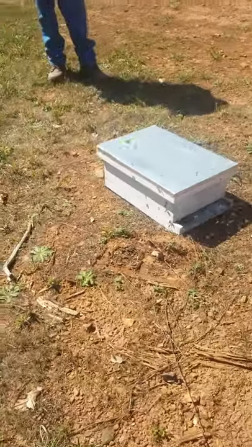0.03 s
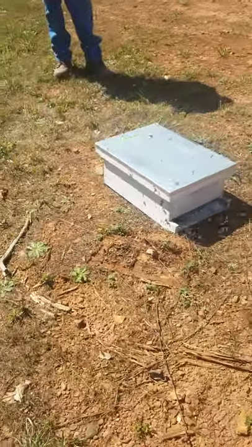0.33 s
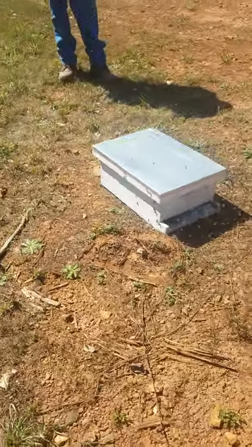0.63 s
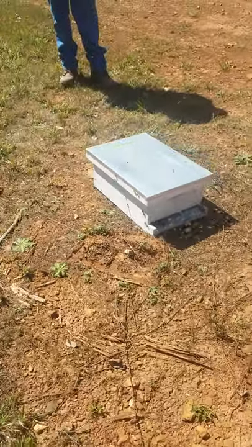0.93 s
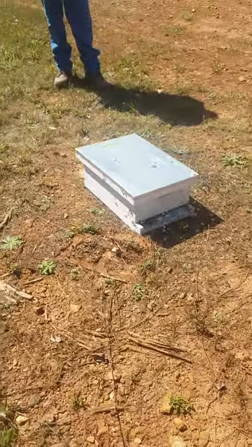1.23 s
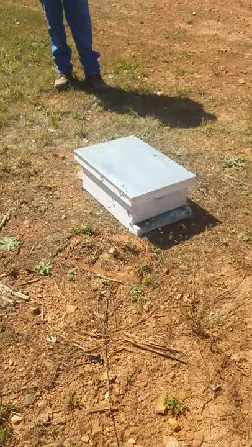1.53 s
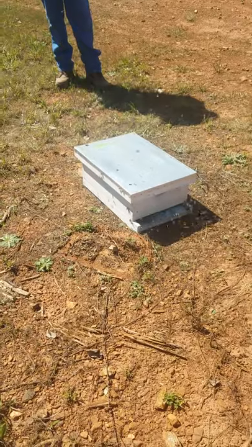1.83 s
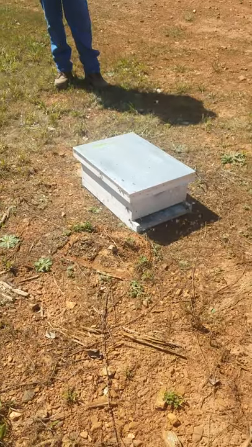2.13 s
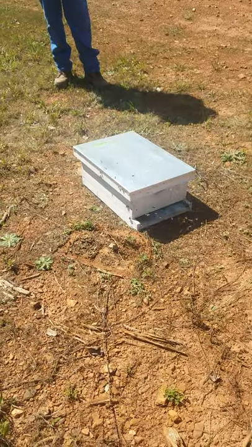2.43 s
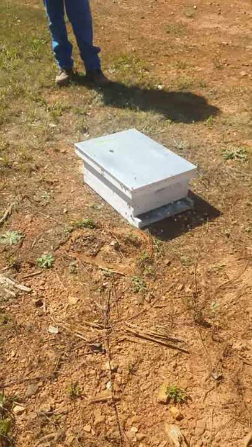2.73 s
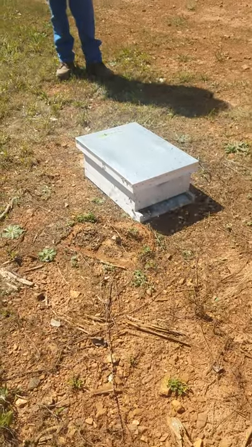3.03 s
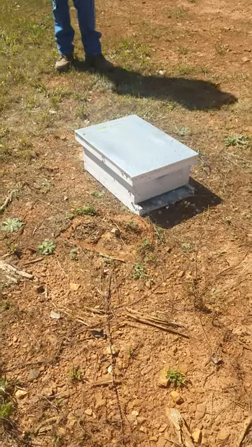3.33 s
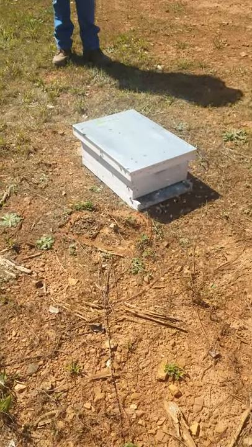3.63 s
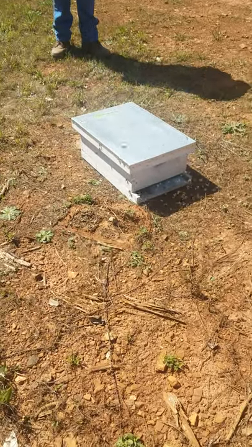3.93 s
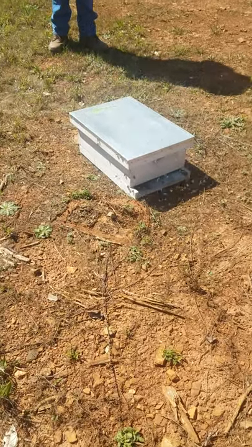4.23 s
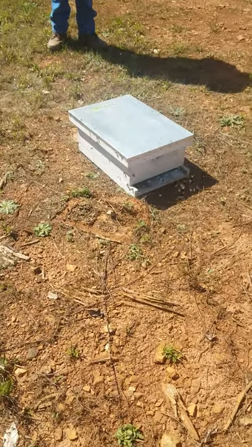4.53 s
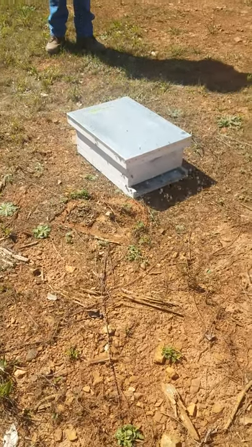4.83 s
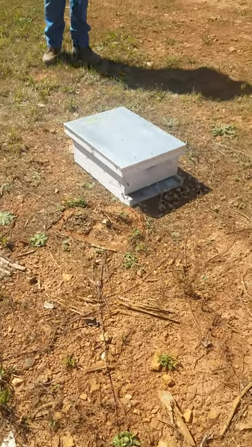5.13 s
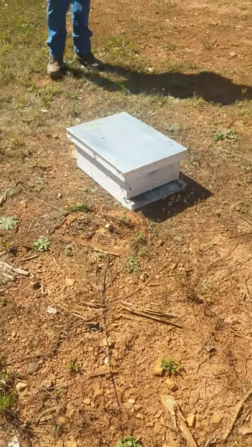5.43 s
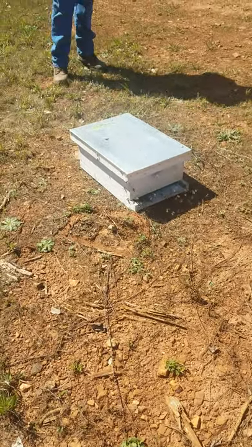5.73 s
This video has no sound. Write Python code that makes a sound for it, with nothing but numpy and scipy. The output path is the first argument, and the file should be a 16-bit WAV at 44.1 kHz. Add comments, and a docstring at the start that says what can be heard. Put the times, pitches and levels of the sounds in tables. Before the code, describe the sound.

Gusty wind rumbles and thumps on the microphone outdoors, over faint bee humming, boot scuffs in dry grass and distant birds.

```python
"""Wind on a microphone beside a beehive.

Gusts buffet the two ports of a hand-held microphone with rumble and eddies. Beneath them, in a dry
field, bees' wingbeats hum, boots scuff grass and soil, twigs tick, small birds call far off and a
hand rubs the case. The left port is open; the sheltered right one hears the field weaker and duller."""
import sys
import numpy as np
from scipy import signal
from scipy.fft import rfft, irfft, next_fast_len
from scipy.io import wavfile
from scipy.ndimage import uniform_filter1d, minimum_filter1d, map_coordinates

SR = 44100
rng = np.random.default_rng(int(sys.argv[2]) if len(sys.argv) > 2 else 0)


def master_out(mix):
    """Clip the mix to full scale and print it as 16-bit PCM to the path in sys.argv[1]."""
    frames = np.transpose(np.atleast_2d(mix))
    ceiling = np.clip(frames, -1, 1)
    pcm = np.round(ceiling * 32767).astype(np.int16)
    wavfile.write(sys.argv[1], SR, pcm)


N = 254898


def amp(db):
    """Decibels to gain."""
    return 10 ** (np.asarray(db) / 20)


def unit(x):
    """Scale to rms 1."""
    return x / np.sqrt(np.mean(x ** 2) + 1e-20)


def even(x, window_samples=1800):
    """Hold the short-term rms near 1."""
    power = uniform_filter1d(uniform_filter1d(x ** 2, window_samples), window_samples // 2)
    return x / np.sqrt(np.abs(power) + .062 * np.mean(x ** 2))


def along(points, hz):
    """Interpolate (freq_hz, value) points on a log axis."""
    freq_hz, values = np.transpose(points)
    return np.interp(np.log(hz + 1), np.log(freq_hz + 1), values)


def wobble(rate_hz):
    """Smooth random curve through rate_hz knots a second."""
    return map_coordinates(rng.standard_normal(4096), [np.arange(N) * rate_hz / SR], mode="mirror")


def coloured(x, gain):
    """Filter by the function gain(hz)."""
    size = next_fast_len(N + 8192)
    return irfft(rfft(x, size) * gain(np.fft.rfftfreq(size, 1 / SR)), size)[..., :N]


def shaped(x, curve):
    """Filter by (freq_hz, gain_db) points."""
    return coloured(x, lambda hz: amp(along(curve, hz)))


def noise(spectrum):
    """Noise of the given spectrum, rms 1."""
    return unit(shaped(rng.standard_normal(N), spectrum))


def crackle(spectrum, rate_hz, grain_share):
    """Tiny fractures on a bed of friction noise, rms 1."""
    grains = unit((rng.random(N) < rate_hz / SR) * rng.standard_normal(N))
    friction = rng.standard_normal(N)
    return unit(shaped(np.sqrt(grain_share) * grains + np.sqrt(1 - grain_share) * friction, spectrum))


def add(track, start_s, sound):
    """Mix a short sound into the track."""
    part = track[max(round(start_s * SR), 0):][:len(sound)]
    part += sound[:len(part)]


def swell(start_s, length_s, attack_s, release_s, sag_db_per_s):
    """Gain that rises, holds and dies; attack and release per 20 dB, negative sag grows."""
    t = np.arange(N) / SR - start_s
    outside = np.maximum(-t, 0) / attack_s + np.maximum(t - length_s, 0) / release_s
    return amp(-20 * outside - sag_db_per_s * (np.clip(t, 0, length_s) - length_s / 2))


def overlap(rows, **shape):
    """Power sum of swells, one gain curve per level column."""
    return np.sqrt(sum(np.outer(amp(levels_db), swell(start_s, length_s, **shape)) ** 2
                       for start_s, length_s, *levels_db in rows))


def ports(left, right):
    """Stereo pair: shelter weakens and dulls the right port."""
    # shelter transmission: freq_hz, gain_db
    shelter = [(100, -3.5), (700, -9.5), (2400, -7.5), (4200, -8), (5500, -15), (9000, -40), (15000, -22)]
    return np.array([left, shaped(right, shelter)])


def diffuse(a, b):
    """Two unrelated sounds as one diffuse field, most alike in the bass."""
    # likeness at the two ports: freq_hz, coherence
    coherence = [(60, 0.44), (240, 0.82), (480, 0.69), (950, 0.35), (2000, 0.02), (6000, 0)]
    angle = lambda hz: np.arccos(np.clip(along(coherence, hz), 0, 1)) / 2
    mid = coloured(a, lambda hz: np.cos(angle(hz)))
    side = coloured(b, lambda hz: np.sin(angle(hz)))
    return ports(mid + side, mid - side)


def air():
    """Soft, slowly swaying open air over steady microphone hiss."""
    # open-air spectrum: freq_hz, density_db
    air_spectrum = [(20, 5), (70, 7.5), (150, 1), (210, 4), (320, 0.5), (450, 8.5), (650, -2), (1300, -2),
                    (2000, -7.5), (3300, -12), (5000, -20), (8000, -31), (16000, -45)]
    # channel hiss spectrum: freq_hz, density_db
    hiss_spectrum = [(1000, -20), (4000, -11), (6500, -6), (10000, -5), (12500, 2.5), (16000, -0.5)]
    field = diffuse(noise(air_spectrum), noise(air_spectrum)) * amp(-49.5 + .38 * wobble(2.46))
    return field + np.array([amp(db) * noise(hiss_spectrum) for db in (-59.5, -72.5)])


def note(length_s, start_hz, end_hz):
    """Bird note: a straight glide that swells and fades."""
    progress = np.linspace(0, 1, round(length_s * SR))
    pitch_hz = start_hz + (end_hz - start_hz) * progress
    return np.sin(np.pi * progress) * np.sin(2 * np.pi * np.cumsum(pitch_hz) / SR)


def chirps(start_s=1.418, every_s=.143, top_hz=5200, step_hz=270, level_db=-63):
    """Four falling chirps, each starting lower."""
    out = np.zeros(N)
    for k in range(4):
        chirp = note(length_s=.065, start_hz=top_hz - k * step_hz, end_hz=3130)
        add(out, start_s + k * every_s, amp(level_db) * chirp)
    return out


def seesaw(start_s=2.294, every_s=.2405, high_hz=3420, low_hz=2080, level_db=-58.5):
    """Evenly spaced, slightly falling pips, high and low in turn."""
    out = np.zeros(N)
    for k in range(7):
        for beat, hz in [(k, high_hz), (k + .5, low_hz)]:
            pip = note(length_s=.026, start_hz=hz * 1.0125, end_hz=hz * .9875)
            add(out, start_s + beat * every_s, amp(level_db) * pip)
    return out


def whistle(start_s=5.085, length_s=.32, start_hz=5700, end_hz=5210, settle_s=.08):
    """Thin whistle: an accented downslide, then a wavering note that grows."""
    t = np.maximum(np.arange(N) / SR - start_s, 0)
    pitch_hz = end_hz + (start_hz - end_hz) * np.exp(-t / settle_s)
    phase = 2 * np.pi * np.cumsum(pitch_hz * (1 + .006 * wobble(130))) / SR
    slide = amp(-67) * swell(start_s, settle_s / 2, attack_s=.025, release_s=.06, sag_db_per_s=10)
    hold = amp(-70) * swell(start_s, length_s, attack_s=.025, release_s=.04, sag_db_per_s=-50)
    return (slide + hold) * amp(3 * wobble(45)) * np.sin(phase)


def scattered(x, t60_s, wet_db):
    """Ground and trees add a short diffuse tail."""
    t = np.arange(SR // 3) / SR
    tail = rng.standard_normal(len(t)) * amp(-60 * t / t60_s)
    return x + amp(wet_db) * signal.fftconvolve(x, tail / np.linalg.norm(tail))[:N]


def birds():
    """Three far birds across the field."""
    calls = chirps() + seesaw() + whistle()
    left = scattered(calls, t60_s=.31, wet_db=-5.5)
    right = amp(-11) * scattered(calls, t60_s=.2, wet_db=1)
    return ports(left, right)


def bees(count=8):
    """Wingbeats of count bees per kind, each drifting in pitch and distance."""
    # wingbeat of each kind: pitch_hz, drift_ratio, level_db
    wingbeats = [(257, .03, -51.5), (203, .03, -58)]
    # wingbeat harmonics: multiple, level_db
    harmonics = [(1, -2.5), (2, -.7), (3, -12), (4, -9.5), (5, -12.5), (6, -26)]
    out = np.zeros(N)
    for pitch_hz, drift_ratio, level_db in wingbeats:
        for _ in range(count):
            phase = 2 * np.pi * np.cumsum(pitch_hz * (1 + drift_ratio * wobble(12))) / SR
            buzz = sum(amp(db) * np.sin(multiple * phase) for multiple, db in harmonics)
            nearness = amp(1.9 * wobble(3.95))
            out += amp(level_db) * unit(buzz * nearness) / np.sqrt(count)
    return out


def footsteps():
    """Boots brush dry blades and crunch soil in uneven clumps."""
    # boot scuffs: start_s, length_s, swish_db, crunch_db
    scuffs = [(.585, .08, -54.5, -55), (.69, .29, -72, -58), (1.87, .14, -65, -64), (2.62, .37, -63.5, -64),
              (3.59, .035, -56.5, -47.5), (3.98, .11, -56.5, -53.5), (4.175, .045, -43, -45),
              (4.235, .11, -54, -57), (4.88, .05, -62, -53), (5.47, .3, -52.5, -51.5),
              (5.53, .035, -45.5, -42.5)]
    # dry grass spectrum: freq_hz, density_db
    grass = [(2500, -30), (4500, -9.5), (6000, -4), (8000, 2), (10000, -2.5), (12500, 4.5), (16000, -3.5)]
    # crumbling soil spectrum: freq_hz, density_db
    soil = [(300, -19), (700, 3.5), (1500, 1.5), (2500, 1), (3600, -4.5), (5000, -10), (8000, -19)]
    swish_gain, crunch_gain = overlap(scuffs, attack_s=.03, release_s=.075, sag_db_per_s=12)
    clumps = amp(2.4 * wobble(130) - .3)
    pair = []
    for _ in range(2):
        swish = swish_gain * crackle(grass, rate_hz=330, grain_share=.65)
        crunch = crunch_gain * crackle(soil, rate_hz=240, grain_share=.6)
        pair.append(clumps * (swish + crunch))
    return ports(*pair)


def ticks(splinter_db=-3, t60_at_1khz_s=.02):
    """Twigs and grit: one crack and brief splintering through a broad resonance."""
    # snaps: start_s, peak_db, centre_hz, width_octaves
    snaps = [(.654, -37, 11000, .6), (.707, -24, 1750, .75), (.772, -23.5, 10600, .65),
             (.792, -34.5, 2100, .55), (.979, -28, 450, 1.2), (2.028, -34, 1980, .7), (2.1, -37, 7000, 1.8),
             (2.8, -38, 9000, .9), (3.218, -36, 12000, 1), (3.256, -37.5, 2000, .7), (3.61, -27, 1400, 1),
             (4.21, -30, 3000, 2.7), (4.297, -27, 11000, 1.1), (4.32, -33, 4500, 1.8),
             (5.067, -28, 1300, 1.4), (5.068, -30, 11000, .83), (5.17, -33, 13500, .7),
             (5.255, -31, 12500, .8), (5.499, -29, 580, .55), (5.549, -25, 1800, 2.1),
             (5.647, -29, 5500, 1.5), (5.702, -27, 3500, 1.6)]
    out = np.zeros((2, N))
    t = np.arange(-SR // 100, SR // 25) / SR
    hz = np.fft.rfftfreq(len(t), 1 / SR) + 1
    crack = unit(1. * (t == 0))
    for start_s, peak_db, centre_hz, width_octaves in snaps:
        t60_s = t60_at_1khz_s * (1000 / centre_hz) ** .25  # higher ticks die sooner
        resonance = np.exp(-(np.log2(hz / centre_hz) / width_octaves) ** 2)
        for port in out:
            splinters = rng.standard_normal(len(t)) * (t > 0) * amp(-60 * np.abs(t) / t60_s)
            snap = irfft(rfft(crack + amp(splinter_db) * unit(splinters)) * resonance)
            add(port, start_s + t[0], amp(peak_db) * snap / np.abs(snap).max())
    return ports(*out)


def grip():
    """Skin drags over the case by the right port, pressing ever harder."""
    # rubbing spectrum: freq_hz, density_db
    rub = [(60, -9), (200, -1), (450, 0), (700, -4), (1000, -10), (2200, -14), (3500, -27), (6000, -50)]
    press = amp(-39) * swell(start_s=5.68, length_s=.12, attack_s=.03, release_s=.05, sag_db_per_s=-50)
    left = amp(-9) * crackle(rub, rate_hz=300, grain_share=.4)
    right = crackle(rub, rate_hz=520, grain_share=.47)
    return press * np.array([left, right])


def low_cut(x, cut_hz):
    """The microphone passes no steady pressure, so every push swings back."""
    return signal.sosfilt(signal.butter(2, cut_hz, "high", fs=SR, output="sos"), x)


def eddy(centre_hz):
    """Passing eddy: a pressure peak between two troughs, centred in 40 ms."""
    u = np.pi * centre_hz * np.arange(-SR // 50, SR // 50) / SR
    return (1 - 3 * u ** 2) / (1 + u ** 2) ** 3


def flutter(centre_hz, scatter_db=3.5, count=480):
    """Small eddies push and suck at uneven intervals, scattered about the curve centre_hz."""
    # port cavity response: freq_hz, gain_db
    cavity = [(25, -10), (60, -1), (100, 3), (150, 2), (230, -2.5), (350, -10), (600, -18), (1200, -24)]
    out = np.zeros(N)
    places = ((np.arange(count) + rng.random(count)) * (N - 1) / count).astype(int)
    for i, (speed, strength, direction) in zip(places, rng.standard_normal((count, 3))):
        pulse = eddy(centre_hz[i] * 2 ** (.24 * speed))
        add(out, i / SR - .02, np.sign(direction + .5) * amp(scatter_db * strength) * pulse)
    return low_cut(even(shaped(out, cavity)), cut_hz=43.5)


def thumps():
    """Eddies big enough to be heard singly."""
    # strong eddies: time_s, level_db, centre_hz
    eddies = [(.514, -19.5, 80), (1.894, -8.5, 128), (2.055, -1, 100), (2.063, 3.5, 216), (2.136, -8, 120),
              (2.255, -12.5, 120), (2.575, -3.5, 130), (2.727, -4.5, 108), (3.091, -14, 140),
              (3.119, -16, 150), (3.18, -8, 128), (3.26, -13.5, 120), (3.341, -15, 131), (3.396, -12.5, 99),
              (3.604, -11, 100), (3.799, -9, 133), (3.843, -4, 150), (3.86, -10, 190), (3.958, -9.5, 110),
              (4.036, -6.5, 174), (4.15, -4, 156), (4.239, -4, 167), (4.47, -7, 110), (4.683, -5, 135),
              (4.822, -10, 98), (4.959, -12, 98), (5.115, -11, 130), (5.29, -8, 109), (5.655, -4, 128),
              (5.686, -4.5, 101)]
    out = np.zeros(N)
    for time_s, level_db, centre_hz in eddies:
        add(out, time_s - .02, amp(level_db) * eddy(centre_hz))
    return low_cut(out, cut_hz=35)


def buffet(gust_gain, calm_db, knee_db, eddy_hz, octaves_per_db, flutter_db, rumble_db, puff_db):
    """Wind on one port: above the knee, smooth breeze breaks into puffs of rumble and eddies."""
    # gust rumble spectrum: freq_hz, density_db
    rumble_spectrum = [(10, -33), (22, -18), (43, -8), (75, 2), (125, 1), (170, -3), (220, -9), (300, -18),
                       (450, -34), (700, -56), (1500, -90)]
    # deeper spectrum of a light breeze: freq_hz, density_db
    breeze_spectrum = [(10, -28), (22, -7), (43, -1.5), (75, 0.5), (110, -4.5), (180, -18), (300, -36),
                       (700, -70)]
    calm_gain = amp(calm_db + 1.5 * wobble(10))
    flow = np.hypot(gust_gain, calm_gain)
    over_knee_db = 20 * np.log10(flow) - knee_db
    broken_share = 1 / (1 + amp(-1.96 * over_knee_db))
    eddies = flutter(eddy_hz * 2 ** (octaves_per_db * over_knee_db))  # faster flow, shorter eddies
    turbulence = amp(rumble_db) * even(noise(rumble_spectrum)) + amp(flutter_db) * eddies
    depth_db = puff_db * np.clip(1 - over_knee_db / 36, .2, 1)  # harder gusts are steadier
    puffs = even(amp(depth_db * wobble(45)), window_samples=3000)
    breeze = even(noise(breeze_spectrum))
    return flow * (np.sqrt(1 - broken_share) * breeze + np.sqrt(broken_share) * puffs * turbulence)


def wind():
    """The same gusts reach both ports, each with its own turbulence; big eddies thump the left."""
    # gusts: start_s, length_s, left_db, right_db
    gusts = [(.24, .08, -39, -60), (.465, .055, -35.5, -60), (1.27, .04, -39.5, -53), (1.45, .2, -47, -56),
             (1.71, .16, -33.5, -45), (1.885, .28, -22.5, -36.5), (2.05, .028, -11, -36),
             (2.21, .16, -28, -41), (2.38, .09, -20.5, -41), (2.48, .07, -36, -49), (2.567, .2, -18.3, -42),
             (2.77, .085, -21, -42), (2.87, .11, -35, -42), (2.995, .14, -30, -42), (3.17, .14, -26, -31.5),
             (3.36, .2, -43, -49), (3.575, .04, -24, -41), (3.67, .1, -46, -39), (3.795, .075, -21, -37),
             (3.9, .08, -26, -38), (4.02, .25, -17, -34), (4.28, .08, -21, -48), (4.37, .08, -28, -55),
             (4.465, .14, -18.5, -42), (4.66, .035, -19, -35), (4.735, .09, -22.5, -41),
             (4.9, .13, -36, -56), (5.04, .15, -25, -46), (5.19, .11, -19, -46), (5.32, .11, -23, -44),
             (5.44, .07, -18, -43), (5.52, .08, -29, -53), (5.6, .18, -21.5, -42)]
    exposed, sheltered = overlap(gusts, attack_s=.024, release_s=.036, sag_db_per_s=4)
    left = buffet(exposed, calm_db=-51.5, knee_db=-37.5, eddy_hz=88, octaves_per_db=.055,
                  flutter_db=-2.3, rumble_db=-.7, puff_db=4.6)
    right = buffet(sheltered, calm_db=-57.5, knee_db=-50, eddy_hz=113, octaves_per_db=.08,
                   flutter_db=-2, rumble_db=-4, puff_db=3.8)
    return np.array([left + thumps(), right])


def limiter(x, ceiling, window_samples=1500):
    """The gain ducks briefly around any peak above the ceiling."""
    needed = np.minimum(1, ceiling / (np.abs(x).max(axis=0) + 1e-9))
    return x * uniform_filter1d(minimum_filter1d(needed, window_samples), window_samples)


def scene():
    """Wind on the ports over the quiet field."""
    return wind() + air() + diffuse(bees(), bees()) + footsteps() + ticks() + grip() + birds()


def record(dry):
    """Peak limiter, then a sharp band limit."""
    return coloured(limiter(dry, ceiling=.93), lambda hz: hz < 15900)


dry = scene()
out = record(dry)
master_out(out)
```